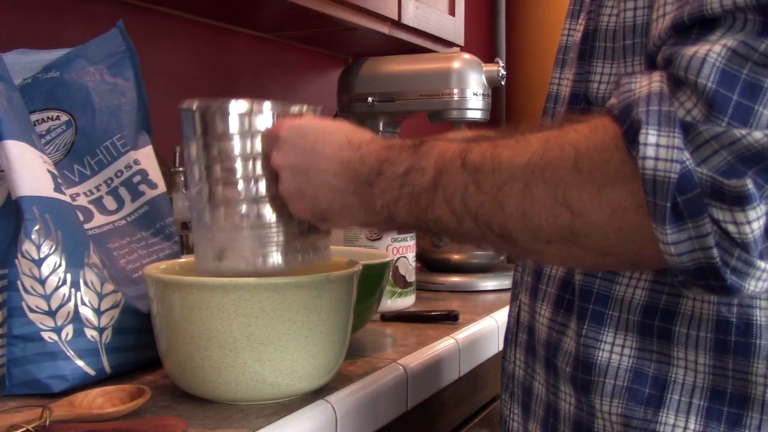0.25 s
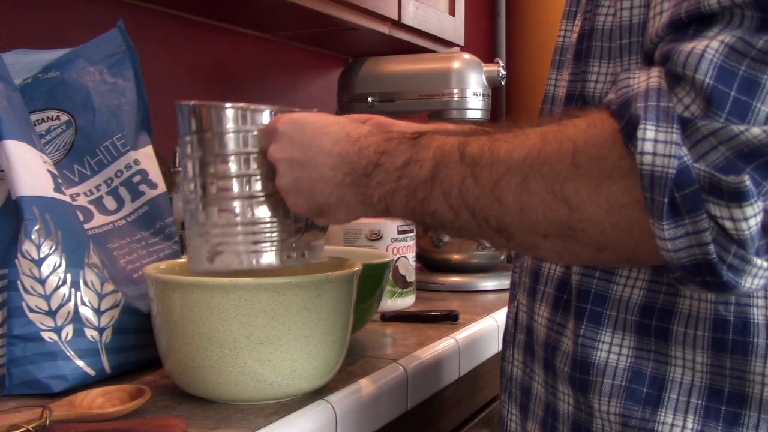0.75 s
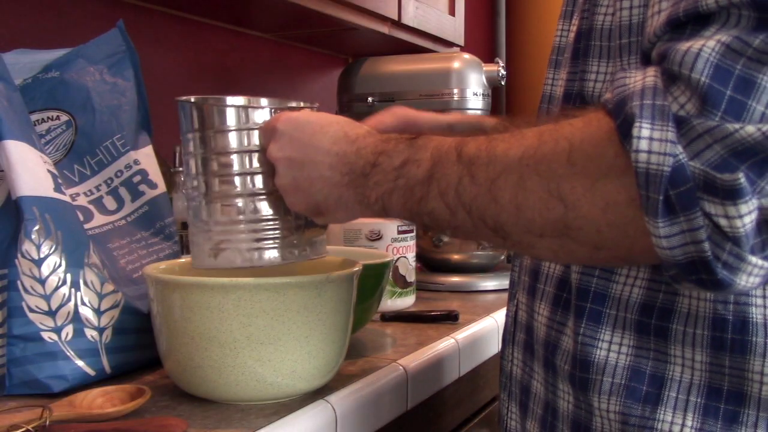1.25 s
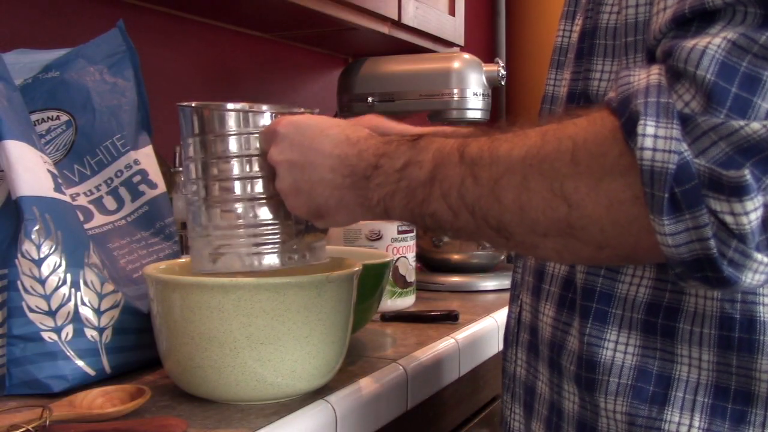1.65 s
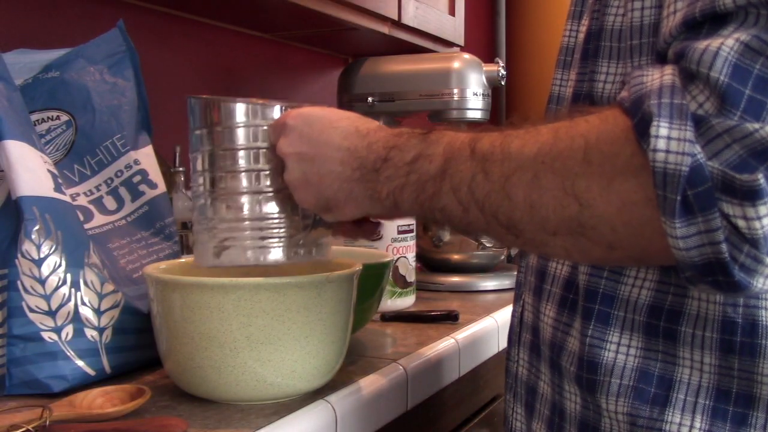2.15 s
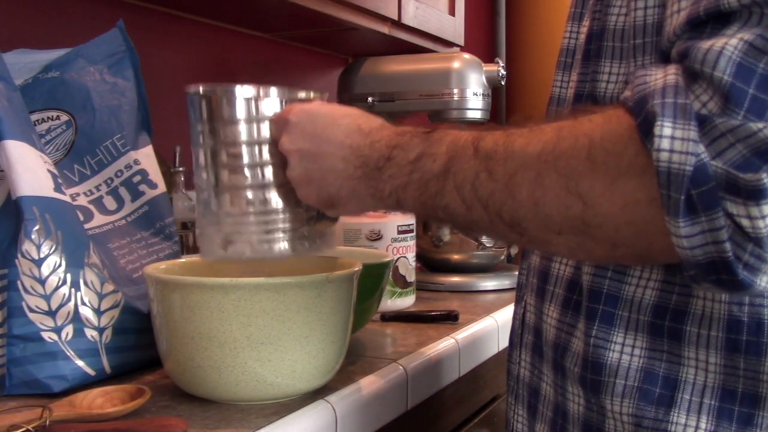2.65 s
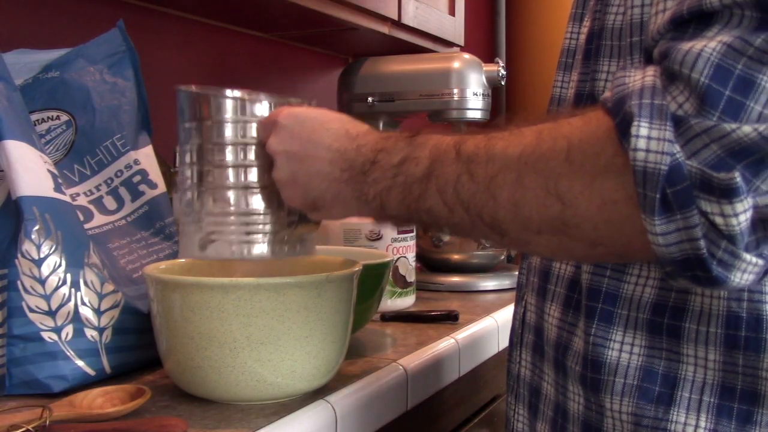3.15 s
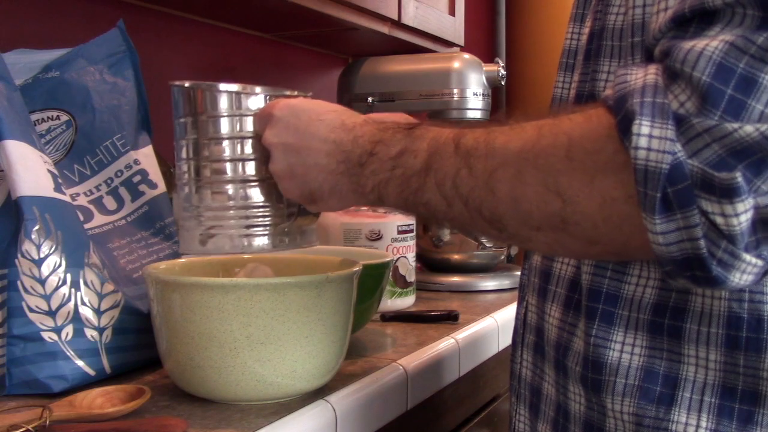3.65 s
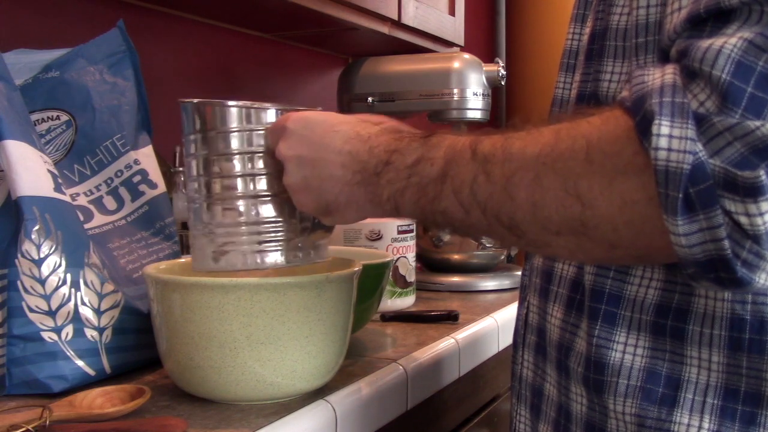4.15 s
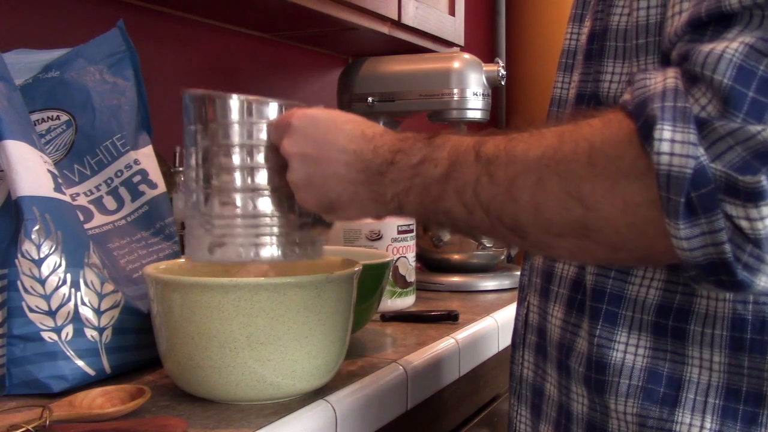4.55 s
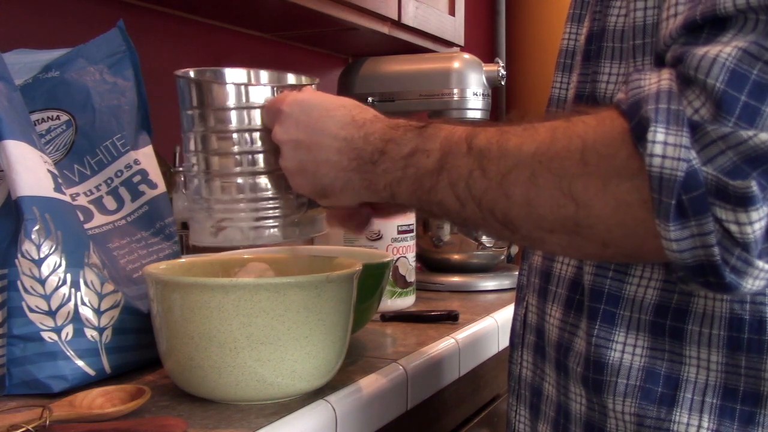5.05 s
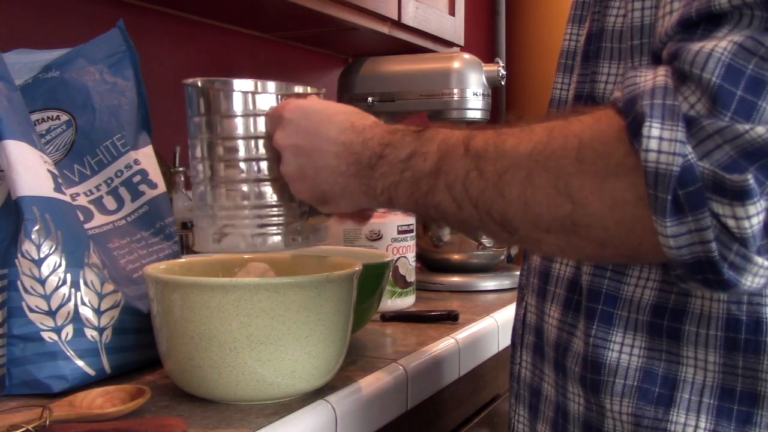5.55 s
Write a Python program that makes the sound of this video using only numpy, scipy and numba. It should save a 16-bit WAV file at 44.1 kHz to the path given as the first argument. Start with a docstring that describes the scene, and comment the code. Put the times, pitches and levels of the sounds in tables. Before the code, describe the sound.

A hand-worked metal flour sifter is heard close up in a small kitchen. Short rasping strokes, about six a second, start soft and dull, then turn louder and brighter after about one second. Thin tinny clicks and rattles punctuate them, with a low floury scrubbing beneath. There is a brief lull around three and a half seconds, then vigorous scraping to the end. Short, close room reflections, light stereo, faint hiss and hum.

```python
"""Rasping metal strokes, a low scrubbing and bright clicks: a tin flour sifter worked over a bowl in a kitchen.
Wire blades slip over the mesh as irregular impulses that ring the can's resonances. The flour-laden screen
answers with softer impulses through low resonances, plus a gliding groan. The loose linkage clicks as noise
bursts with ringing sines and knocks; the pivot squeaks and the handle thumps as sines. Cupboards give a short
echo of decaying noise, heard by two nearby microphone ports over hiss and mains hum."""
import sys
import numpy as np
from scipy import signal
from scipy.fft import rfft, irfft, next_fast_len
from scipy.io import wavfile
from scipy.ndimage import uniform_filter1d, map_coordinates
from numba import njit

SR = 44100
rng = np.random.default_rng(int(sys.argv[2]) if len(sys.argv) > 2 else 0)


def wav_out(sig):
    """Save sig, one row per channel (or a flat mono array), as 16-bit PCM at SR to the path in sys.argv[1]."""
    wavfile.write(sys.argv[1], SR, np.round(np.clip(np.atleast_2d(sig).T, -1, 1) * 32767).astype(np.int16))


N = 255339

# Spectrum of the kitchen at rest. Each row: frequency in Hz, relative density in dB.
QUIET_SPECTRUM = [(22, -28), (44, -21), (60, -1.5), (76, -12.5), (170, -24), (520, -19), (1600, -39),
                  (7700, -42), (9000, -38.5), (11200, -30), (15000, -46)]
# Reverberation of the kitchen. Each row: frequency in Hz, 60 dB decay time in seconds.
KITCHEN_T60 = [(200, 0.43), (550, 0.22), (1400, 0.27), (4000, 0.24), (9000, 0.22), (15000, 0.24)]
# Colour difference of the microphone ports. Each row: frequency in Hz, left minus right in dB.
PORT_DIFFERENCE = [(1000, 1.4), (2000, -1.0), (4000, -1.1), (5200, -1.5), (6400, -4.9), (7900, -11.5),
                   (8400, -10.1), (9200, -0.3), (10600, 12.0), (11700, 12.0), (13000, 6.2), (15500, 3.7)]
# Correlation of the two ports for diffuse sound. Each row: frequency in Hz, correlation from 0 to 1.
PORT_CORRELATION = [(40, 0.4), (150, 1), (600, 0.52), (1500, 0.17), (6000, 0)]
# Soft thumps of the handle in the hand. Each row: start in seconds, relative level in dB.
THUMPS = [(0.324, -55), (3.97, -34)]
# Faint squeaks of the pivot. Each row: start in seconds, length in seconds, mean pitch in Hz, level in dB.
SQUEAKS = [(2.998, 0.054, 755, -51), (3.353, 0.14, 740, -56), (3.52, 0.27, 753, -72)]
# Linkage striking the can. Each row: time in seconds, relative level in dB, ring in Hz,
# knock in dB relative to that level.
CLICKS = [(0.3789, -13, 7640, -17), (0.823, -27, 4060, -5), (0.9353, -15.5, 7760, -25.0),
          (1.3348, -6.5, 5560, -15.0), (1.3859, -3, 6410, -15), (1.474, 0, 8340, -21),
          (1.5642, -2.0, 6540, -15.0), (1.7286, -13, 7960, -13), (1.8248, -9.0, 7590, -22.0),
          (2.0287, -10, 7530, -22.0), (2.1848, -13.5, 7480, -31.0), (2.7256, -5.0, 6190, -16.0),
          (2.834, 1.0, 7610, -33.0), (2.8553, -4.0, 8500, -28.0), (2.8695, -2.0, 7790, -28.0),
          (3.0538, -5, 7520, -27), (3.0918, 1, 2950, -36), (3.2651, -14, 2980, -16),
          (3.333, -5.5, 6650, -21), (3.576, -41, 11500, -26), (3.849, -12.5, 7800, -27.0),
          (3.9898, -2.0, 7500, -27.0), (4.4548, -16.0, 8020, -33.0), (4.4667, -14.0, 8100, -27.0),
          (4.546, -6.5, 6670, -30.0), (4.557, -6.5, 7850, -35.0), (4.826, -33.5, 8400, -35.0),
          (4.8713, -17.5, 8000, -29.0), (4.9056, -1.0, 6700, -25.0), (4.9764, -11, 4100, -16),
          (5.025, -2.0, 7480, -17.0), (5.1123, 1.5, 6470, -21.0), (5.232, -1.0, 10680, -32.0),
          (5.499, -7.0, 7780, -36.0), (5.6102, -7.5, 11560, -34.0)]
# Broad colour of the loaded screen. Each row: frequency in Hz, relative level in dB.
SCREEN_COLOUR = [(60, -35), (130, -12.5), (210, -13), (320, -19.5), (420, -4.5), (600, -1), (740, -7.5),
                 (950, -9), (1300, -18), (2500, -29)]
# Resonances of the screen and the air in the can. Each row: centre in Hz, width in Hz, lift in dB.
SCREEN_MODES = [(270, 59, 13), (429, 34, 1), (542, 100, -1), (693, 66, 8.5), (851, 51, 9)]
# Low drumming of the screen. Each row: time in seconds, gain in dB.
DRUM_GAIN = [(0.3, 10), (0.65, -6), (1.4, -2), (1.8, -3), (2.25, 9), (2.7, 3), (3.2, 7), (4.1, 10),
             (4.65, 3), (4.95, -3), (5.25, 2), (5.79, -16)]
# Broad colour of the can. Each row: frequency in Hz, relative level in dB.
CAN_COLOUR = [(100, -23.5), (350, -17.5), (900, -10), (1450, -15.5), (2200, -7), (3500, -6.5), (5000, -6.5),
              (6500, -5), (8200, -1.5), (8900, -12.5), (9600, -10.5), (11000, -2), (12500, -8),
              (15500, -20)]
# Resonances of the can. Each row: centre in Hz, width in Hz, lift in dB.
CAN_MODES = [(856, 39, 9), (1861, 81, 9.5), (2978, 94, 8), (4204, 290, 5), (6425, 450, 5.5), (8010, 280, 3),
             (9950, 150, 7)]
# Grit, the lower part of the scrape. Each row: time in seconds, gain in dB.
GRIT_GAIN = [(0.1, -4), (0.9, 4.5), (1.55, 3), (2.2, 0.5), (2.85, -3), (3.15, 5.5), (4.0, -1), (4.6, 2.5),
             (5.6, 4)]
# Blades brushing the mesh while the hand rests. Each row: start in seconds, end in seconds, level in dB.
BRUSHES = [(1.66, 1.72, -55), (4.38, 4.45, -59), (5.72, 5.79, -58)]
# Sweeps of the blades over the mesh. Each row: full grip in seconds, swell in seconds per 20 dB, hold in
# seconds, relative scrape in dB, relative flour rub in dB, growth over the hold in dB, groan in Hz.
STROKES = [(0.0, 0.02, 0.099, -46.5, -40.5, 0.0, 580), (0.3, 0.056, 0.107, -42.5, -38.5, -1.0, 610),
           (0.509, 0.028, 0.128, -44.5, -38.0, -14.0, 530), (0.693, 0.027, 0.095, -49.0, -43.0, -6.0, 680),
           (0.881, 0.008, 0.051, -36.0, -33.5, 2.0, 650), (1.041, 0.129, 0.084, -44.5, -42.5, 0.0, 770),
           (1.18, 0.029, 0.038, -36.5, -38.5, 4.0, 660), (1.3, 0.028, 0.11, -29.5, -30.5, 8, 580),
           (1.472, 0.004, 0.097, -28.5, -34.0, -3.0, 600), (1.714, 0.053, 0.031, -37.5, -34.5, 18.0, 570),
           (1.822, 0.045, 0.068, -35.0, -38.0, -12.0, 690), (1.948, 0.042, 0.098, -35.5, -38.0, -7.0, 650),
           (2.192, 0.036, 0.08, -28.5, -39.0, -1.0, 610), (2.371, 0.073, 0.063, -41.0, -47.5, 5.0, 700),
           (2.491, 0.018, 0.035, -37.5, -41.5, -3.0, 530), (2.634, 0.01, 0.12, -36.0, -41.5, 14.0, 680),
           (2.846, 0.037, 0.053, -28.5, -37.5, -8.0, 520), (3.042, 0.022, 0.055, -32, -37.0, 6, 710),
           (3.152, 0.02, 0.07, -33.0, -37.0, -1.0, 690), (3.264, 0.003, 0.082, -35.0, -40.5, 0.0, 590),
           (3.791, 0.017, 0.026, -36.0, -44.0, 5.0, 680), (3.851, 0.012, 0.082, -31.0, -36.0, -11.0, 700),
           (3.992, 0.085, 0.07, -28.5, -38.0, 2, 710), (4.093, 0.033, 0.056, -41.0, -49.5, -1.0, 450),
           (4.191, 0.046, 0.123, -31.0, -38.0, -7.0, 560), (4.458, 0.007, 0.018, -34.0, -51.5, -3.0, 520),
           (4.546, 0.043, 0.037, -28.5, -36.5, 0.0, 760), (4.672, 0.079, 0.031, -46.5, -46.0, -7.0, 460),
           (4.888, 0.02, 0.037, -27.0, -35.5, 4.0, 750), (4.986, 0.025, 0.081, -26.5, -33.0, -11.0, 750),
           (5.105, 0.016, 0.141, -30.0, -37.0, 5.0, 640), (5.291, 0.033, 0.074, -35.5, -39.5, -6.0, 690),
           (5.412, 0.015, 0.093, -27.5, -36.5, 4.0, 530), (5.554, 0.043, 0.062, -26.5, -35.5, 2.0, 690),
           (5.67, 0.035, 0.043, -40.0, -46.5, -13.0, 680)]

SCRAPE_RELEASE_DB_PER_S, RUB_RELEASE_DB_PER_S = 470, 370  # fall as the blades come to rest
RUB_GROWTH_SHARE = 0.6  # the flour follows the hand's pressure less than the metal does
GROAN_GLIDE_OCTAVES = -0.068  # over each hold
TOP_HZ = 15900


def amp(db):
    """Decibels to gain."""
    return 10 ** (np.asarray(db) / 20)


def unit(x):
    """Scale to rms 1."""
    return x / np.sqrt(np.mean(x ** 2) + 1e-20)


def along(points, hz):
    """Read (Hz, value) points on a log frequency axis."""
    f, v = np.transpose(points)
    return np.interp(np.log(hz + 1), np.log(f), v)


def curve(rows):
    """One value per sample from (seconds, value) rows."""
    return np.interp(np.arange(N) / SR, *np.transpose(rows))


def wobble(knots_per_s):
    """A smooth random curve through normally distributed knots."""
    knots = rng.standard_normal(int(N * knots_per_s / SR) + 4)
    return map_coordinates(knots, [np.arange(N) * knots_per_s / SR])


def filtered(x, response):
    """Multiply the spectrum of x by a function of frequency."""
    n = x.shape[-1]
    m = next_fast_len(n + 8192)
    return irfft(rfft(x, m) * response(np.fft.rfftfreq(m, 1 / SR)), m)[..., :n]


def low_part(x, hz):
    """The part of x below a gentle crossover."""
    return signal.sosfiltfilt(signal.butter(1, hz, fs=SR, output="sos"), x)


def noise_pair(size):
    """Two white noises, alike in the bass and less so in the treble."""
    def mid_side_gains(hz):
        turn = np.arccos(np.clip(along(PORT_CORRELATION, hz), 0, 1)) / 2
        return np.array([np.cos(turn), np.sin(turn)])

    mid, side = filtered(rng.standard_normal((2, size)), mid_side_gains)
    return np.array([mid + side, mid - side])


def background(hiss_db=-63, hum_db=-66, hum_hz=120):
    """Coloured room noise and the mains hum of an appliance, which wavers slightly in level."""
    hiss = unit(filtered(noise_pair(size=N), lambda hz: amp(along(QUIET_SPECTRUM, hz))))
    hum = np.sin(2 * np.pi * hum_hz * np.arange(N) / SR) * amp(hum_db + 0.5 * wobble(1))
    return amp(hiss_db) * hiss + hum


def echo(near_db, near_t60_s, room_db):
    """One sifter position: direct sound, quick reflections from bowl and counter, the kitchen's tail."""
    t = np.arange(SR // 3) / SR
    near = noise_pair(size=len(t)) * amp(-60 * t / near_t60_s)
    hz, frames, z = signal.stft(noise_pair(size=len(t)), SR, nperseg=256)
    decay = amp(-60 * frames / along(KITCHEN_T60, hz)[:, None])
    tail = signal.istft(z * decay, SR, nperseg=256)[1][:, :len(t)]
    tail = tail * (1 - np.exp(-t / 0.0028))  # gradual onset
    response = amp(near_db) * near / np.linalg.norm(near[0]) + amp(room_db) * tail / np.linalg.norm(tail[0])
    # direct sound: each position lies at a slightly different angle to the ports
    response[[0, 1], rng.integers(3, size=2)] += 1
    return response / np.linalg.norm(response[0])


def kitchen(x, count=9):
    """Reflections change as the hands move the sifter: crossfade through count echo positions."""
    place = np.linspace(0, count - 1, N)
    out = np.zeros((2, N + SR))
    for k in range(count):
        span = np.flatnonzero(abs(place - k) < 1)
        part = x[span] * np.cos(np.pi / 2 * (place[span] - k))
        heard = signal.fftconvolve(part[None], echo(near_db=3.0, near_t60_s=0.029, room_db=-1), axes=1)
        out[:, span[0]:span[0] + heard.shape[1]] += heard
    return out[:, :N]


def ports(hz, lag_s=0.00014):
    """Each port has its own colour, and the sifter reaches the right one first."""
    gains = amp(np.outer([.5, -.5], along(PORT_DIFFERENCE, hz)))
    gains = gains / np.sqrt(np.mean(gains ** 2, axis=0))
    return gains * np.exp(1j * np.pi * lag_s * np.outer([-1, 1], hz))


def handle(hz=55, t60_s=0.17, gain_db=-1, rise_s=0.033):
    """The handle jolts in the hand: a low sine with a soft rise and exponential decay."""
    out, t = np.zeros(N + SR), np.arange(SR // 4) / SR
    for start_s, db in THUMPS:
        swell = amp(db + gain_db - 60 * t / t60_s) * (1 - np.exp(-t / rise_s))
        out[round(start_s * SR):][:len(t)] += swell * np.sin(2 * np.pi * hz * t)
    return out[:N]


def squeaks(waver=0.0039):
    """The pivot sings softly while the hand eases off: sines of wavering pitch."""
    out = np.zeros(N)
    for start_s, length_s, hz, db in SQUEAKS:
        swell = np.sin(np.pi * np.clip((np.arange(N) / SR - start_s) / length_s, 0, 1))
        phase = 2 * np.pi * np.cumsum(hz * (1 + waver * wobble(29.9))) / SR
        out += amp(db) * swell * np.sin(phase)
    return out


def body(force, colour, modes, size=8192):
    """Ring a causal (minimum-phase) body of unit energy: a broad colour with resonant peaks."""
    hz = np.fft.rfftfreq(size, 1 / SR)
    peaks_db = sum(lift / (1 + (2 * (hz - centre) / width) ** 2) for centre, width, lift in modes)
    cepstrum = irfft(np.log(amp(along(colour, hz) + peaks_db)))
    cepstrum[1:size // 2] *= 2
    cepstrum[size // 2 + 1:] = 0
    ring = irfft(np.exp(rfft(cepstrum)))
    ring = ring[None] / np.linalg.norm(ring)
    return signal.oaconvolve(np.atleast_2d(force), ring, axes=1)[:, :N].squeeze()


def clanks(ring_t60_s=0.055, ring_db=-18, knock_db=16):
    """Each linkage blow excites one decaying ring of the can and knocks the screen with an impulse."""
    rings, knocks = np.zeros((2, N + SR))
    t = np.arange(SR // 6) / SR
    for time_s, db, hz, low_db in CLICKS:
        start = round(time_s * SR)
        rings[start:][:len(t)] += amp(db + ring_db - 60 * t / ring_t60_s) * np.sin(2 * np.pi * hz * t)
        knocks[start] = amp(db + low_db + knock_db)
    return rings[:N] + body(knocks[:N], SCREEN_COLOUR, SCREEN_MODES)


def chatter(t60_s=0.025, gain_db=10.6, dull=0.34):
    """Each linkage blow chatters metal on metal: a short decaying noise burst, thinned below the treble."""
    out, t = np.zeros(N + SR), np.arange(SR // 20) / SR
    for time_s, db, _, _ in CLICKS:
        burst = rng.standard_normal(len(t)) * amp(-60 * t / t60_s)
        out[round(time_s * SR):][:len(t)] += amp(db + gain_db) * burst / np.linalg.norm(burst)
    return (out - dull * low_part(out, hz=7000))[:N]


def slips(rate_hz, spread_db):
    """Stick-slip: random impulses of uneven size and either sign, scaled to mean power 1."""
    chance = np.clip(rate_hz / SR, 1e-4, 1)
    sizes = amp(spread_db * np.clip(rng.standard_normal(N), -2, 2)) * rng.choice([-1, 1], N)
    return unit((rng.random(N) < chance) * sizes / np.sqrt(chance))


def sweeps(levels_db, release_db_per_s, growth_share):
    """Summed level in dB: each sweep swells to full grip, grows or eases while it holds, then dies."""
    power = np.zeros(N)
    for (grip_s, swell_s, hold_s, _, _, growth_db, _), db in zip(STROKES, levels_db):
        t = np.arange(N) / SR - grip_s
        swell_db = 20 * np.minimum(t, 0) / swell_s
        hold_db = growth_share * growth_db * (np.clip(t / hold_s, 0, 1) - .5)
        release_db = release_db_per_s * np.maximum(t - hold_s, 0)
        power += amp(np.maximum(db + swell_db + hold_db - release_db, -130)) ** 2
    return 10 * np.log10(power)


@njit
def resonate(x, pole):
    """A resonance whose complex pole may move from sample to sample."""
    out, state = np.zeros(len(x)), 0j
    for i in range(len(x)):
        state = state * pole[i] + x[i]
        out[i] = state.real
    return out


def sing(x, hz, width_hz):
    """A narrow resonance that keeps the power of white noise."""
    radius = np.exp(-np.pi * width_hz / SR)
    pole = radius * np.exp(2j * np.pi * hz / SR) * np.ones(N)
    return resonate(x, pole) * np.sqrt(2 * (1 - radius ** 2))


def groan_pitch(lead_s=.02):
    """Each sweep groans around its own pitch in Hz and sags through it."""
    pitch, t = np.full(N, float(STROKES[0][-1])), np.arange(N) / SR
    for grip_s, _, hold_s, _, _, _, hz in STROKES:
        now = t >= grip_s - lead_s
        progress = np.minimum((t[now] - grip_s) / hold_s, 1)
        pitch[now] = hz * 2 ** (GROAN_GLIDE_OCTAVES * (progress - .5))
    return pitch


def screen():
    """Flour sticks and gives way under the blades: a soft drumming with a gliding, half-voiced groan."""
    rub_db = sweeps([stroke[4] for stroke in STROKES], RUB_RELEASE_DB_PER_S, RUB_GROWTH_SHARE)
    force = slips(rate_hz=900, spread_db=2.0) * amp(rub_db + 1.66 * wobble(45) - 3.3)
    drumming = force + low_part(force, hz=262) * (amp(curve(DRUM_GAIN)) - 1)
    groan = sing(force, groan_pitch() * amp(0.92 * wobble(28)), width_hz=48)
    # band-pass, 330 to 1000 Hz
    groan = filtered(groan, lambda hz: (hz / 330) ** 4 / (1 + (hz / 330) ** 4) / (1 + (hz / 1000) ** 4))
    return amp(-2.5) * body(drumming, SCREEN_COLOUR, SCREEN_MODES) + amp(-6) * groan


def brushing():
    """Gain of the light touch that the resting blades keep on the mesh."""
    t = np.arange(N) / SR
    return sum(amp(db) * ((t >= start_s) & (t < end_s)) for start_s, end_s, db in BRUSHES)


def blades(count):
    """Blades catch on the mesh wires and now and then snag; a harder stroke is denser and brighter."""
    level_db = sweeps([stroke[3] for stroke in STROKES], SCRAPE_RELEASE_DB_PER_S, growth_share=1)
    effort_db = level_db - level_db.max()
    pressure = (amp(level_db) + brushing()) * amp(0.8 * wobble(130))  # the blades judder as they drag
    rate_hz = 1000 * amp(.25 * effort_db)
    catches = [slips(rate_hz, spread_db=1.5) + amp(-5.5) * slips(rate_hz=32, spread_db=3.0)
               for _ in range(count)]
    force = pressure * np.array(catches)
    grit = low_part(force, hz=3480)
    return grit * amp(curve(GRIT_GAIN)) + (force - grit) * amp(0.05 * effort_db + 2.3)


def shifting(x, depth_db, size=512):
    """As the contact point travels it favours one group of the can's modes, then another."""
    z = signal.stft(x, nperseg=size)[2]
    field = uniform_filter1d(rng.standard_normal(z.shape[1:]), size=5, axis=0)  # smooth over frequency
    field = uniform_filter1d(field, size=9, axis=1)  # smooth over time
    gain = unit(amp(depth_db * unit(field)))
    return signal.istft(z * gain, nperseg=size)[1][:, :N]


def scene():
    """Several blades scrape and rattle at once, each at its own place on the can."""
    forces = shifting(blades(count=4), depth_db=3.0)
    contacts = sum(kitchen(force + chatter()) for force in forces) / np.sqrt(len(forces))
    can = body(contacts, CAN_COLOUR, CAN_MODES)
    sifter = can + kitchen(screen() + clanks(), count=20) + squeaks() + handle()
    return filtered(sifter, ports) + background()


def record(dry):
    """Cut the deepest bass, as the microphones do; the sound ends at TOP_HZ."""
    return filtered(dry, lambda hz: (hz < TOP_HZ) * hz ** 3 / (hz ** 3 + 34 ** 3))


dry = scene()
out = record(dry)
wav_out(out)
```